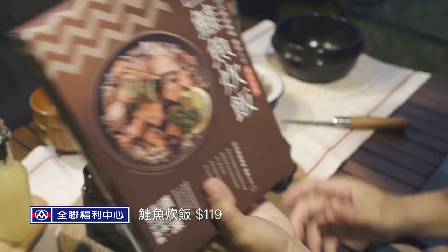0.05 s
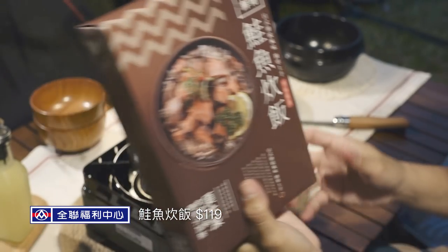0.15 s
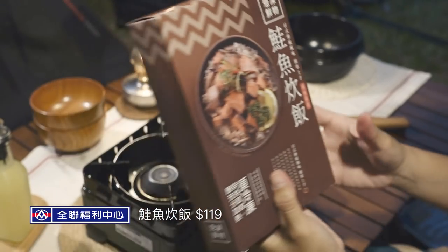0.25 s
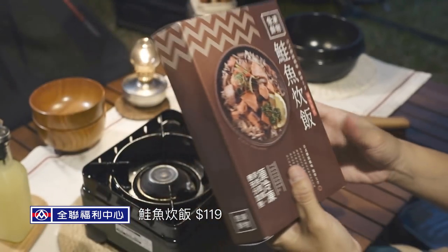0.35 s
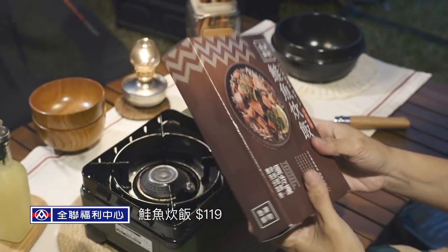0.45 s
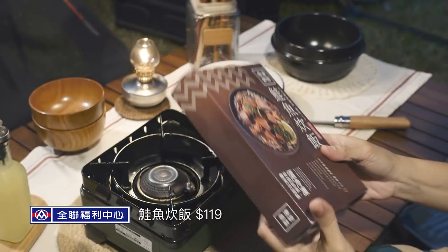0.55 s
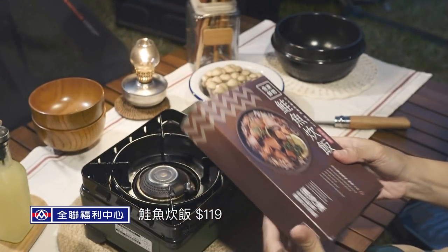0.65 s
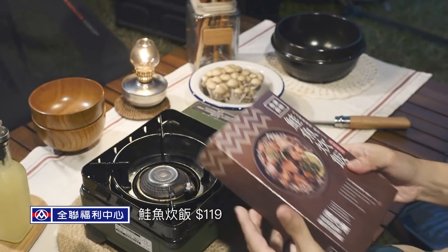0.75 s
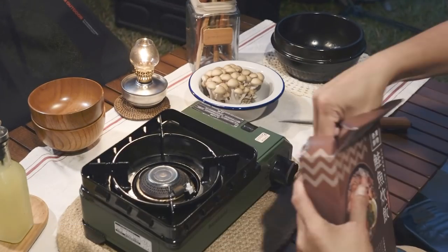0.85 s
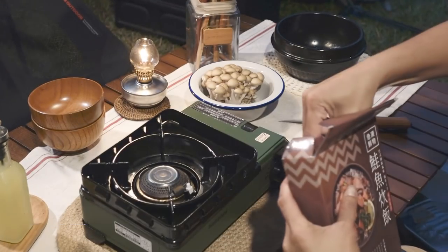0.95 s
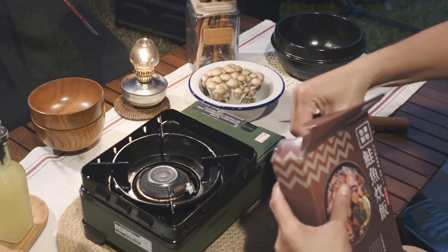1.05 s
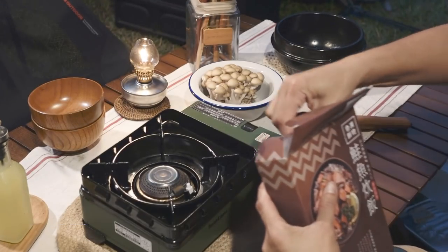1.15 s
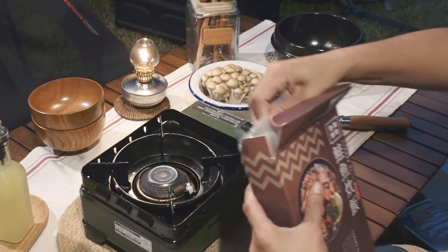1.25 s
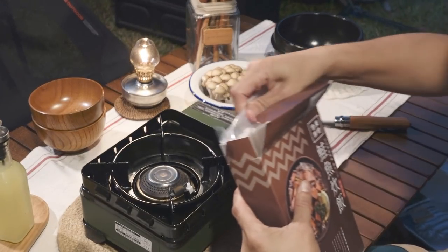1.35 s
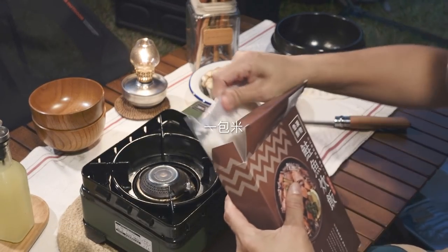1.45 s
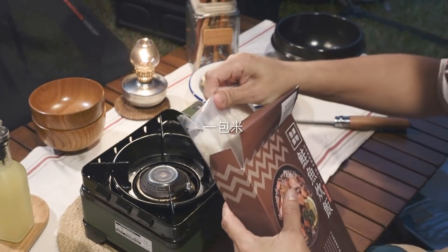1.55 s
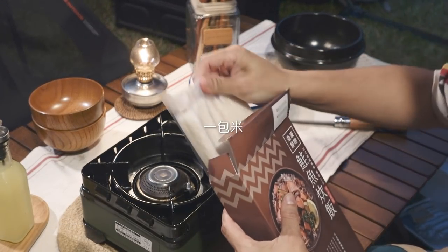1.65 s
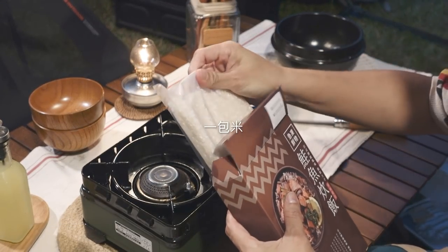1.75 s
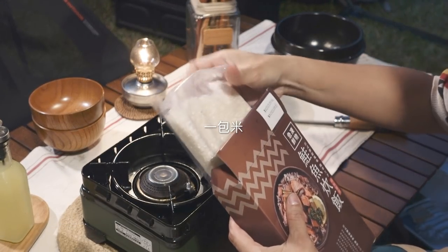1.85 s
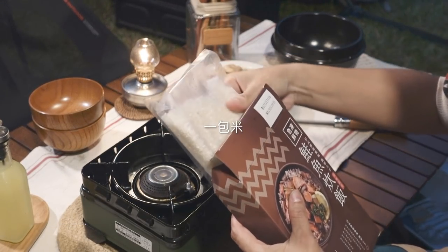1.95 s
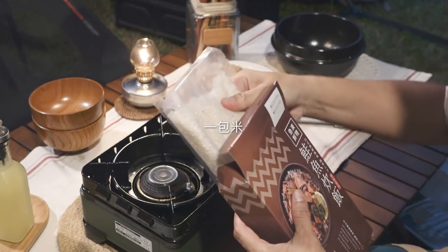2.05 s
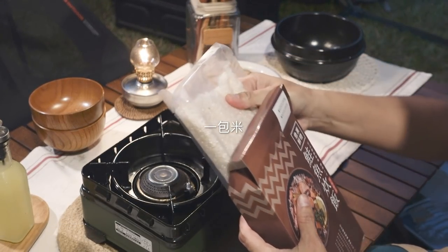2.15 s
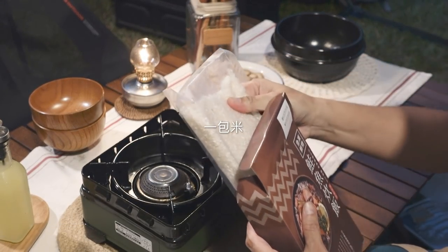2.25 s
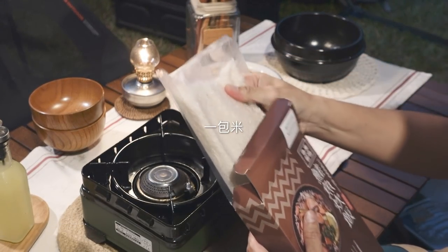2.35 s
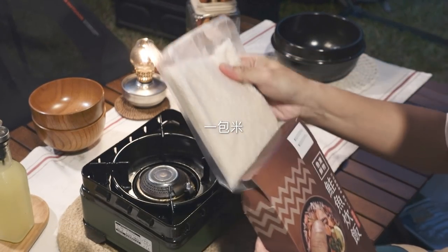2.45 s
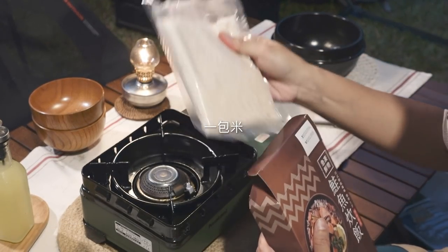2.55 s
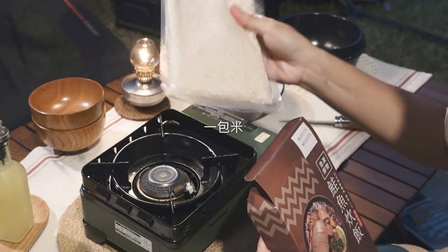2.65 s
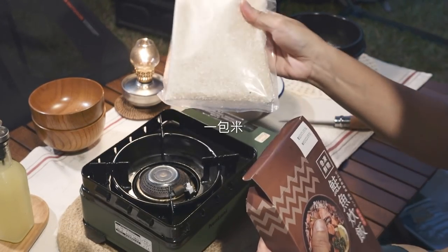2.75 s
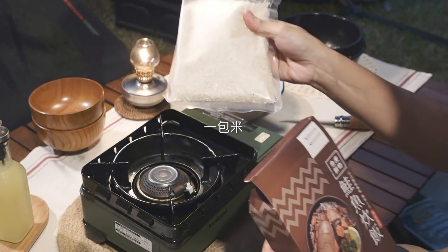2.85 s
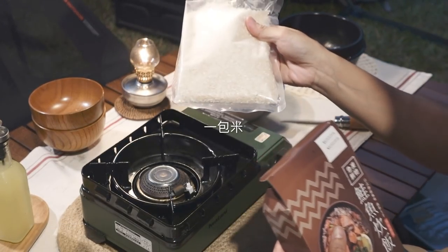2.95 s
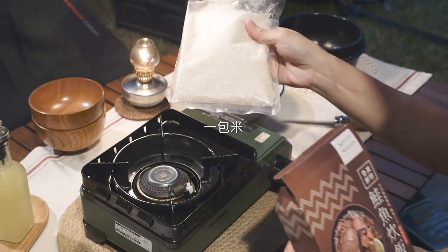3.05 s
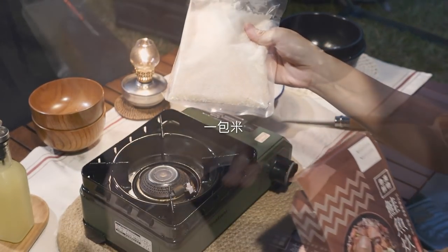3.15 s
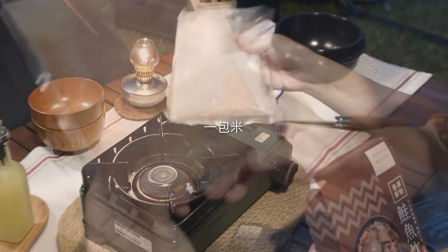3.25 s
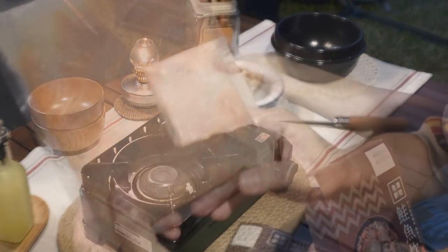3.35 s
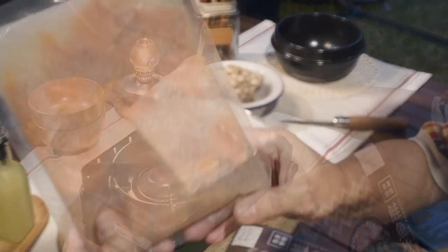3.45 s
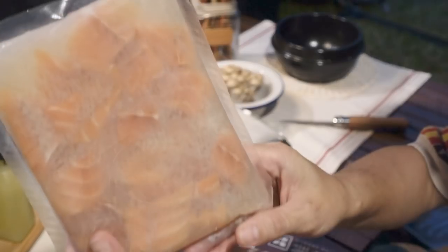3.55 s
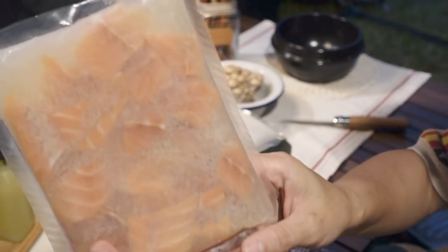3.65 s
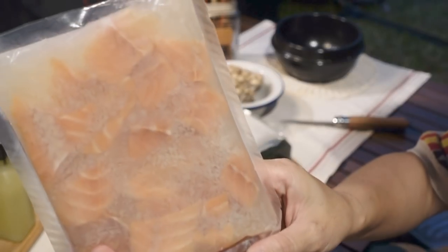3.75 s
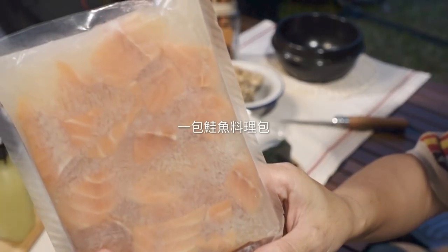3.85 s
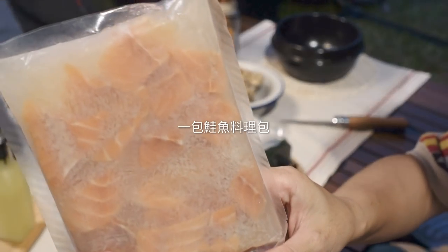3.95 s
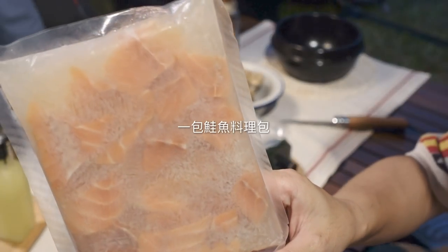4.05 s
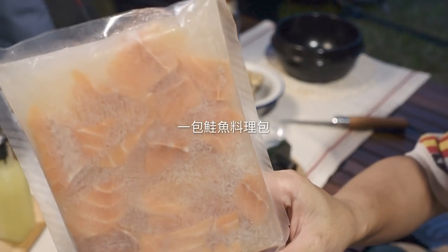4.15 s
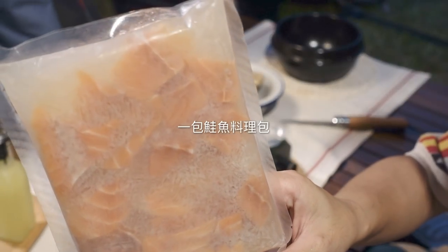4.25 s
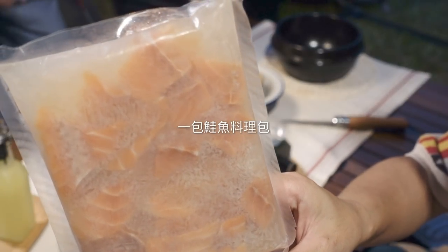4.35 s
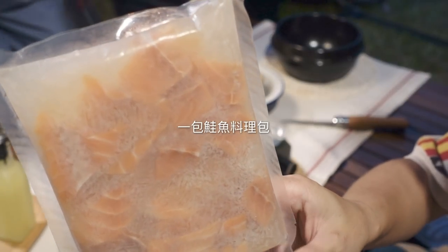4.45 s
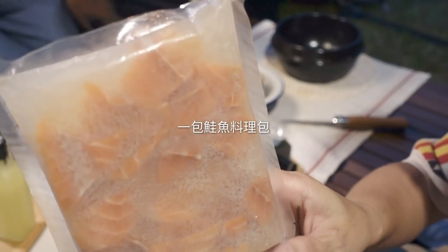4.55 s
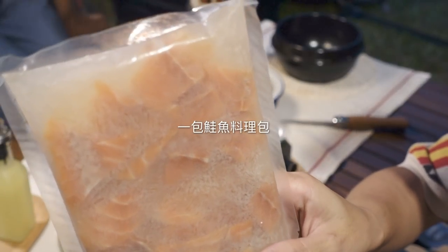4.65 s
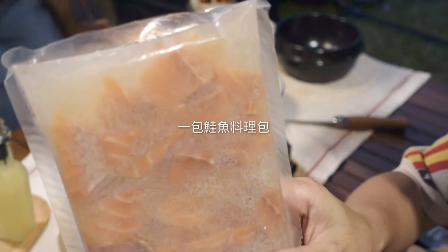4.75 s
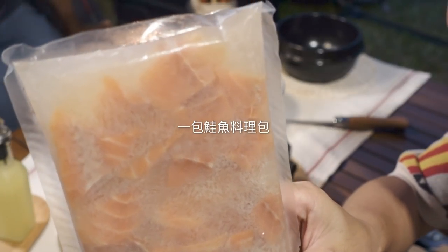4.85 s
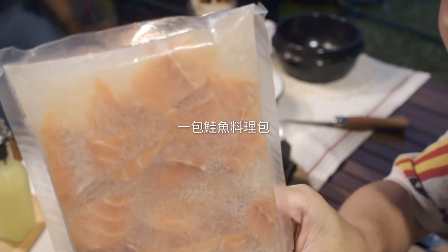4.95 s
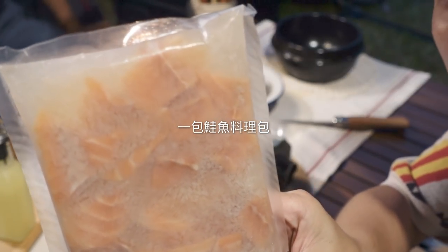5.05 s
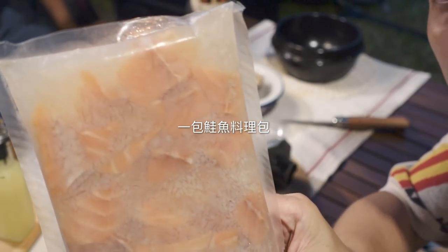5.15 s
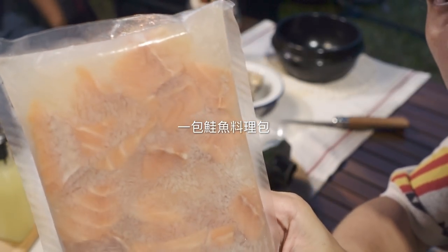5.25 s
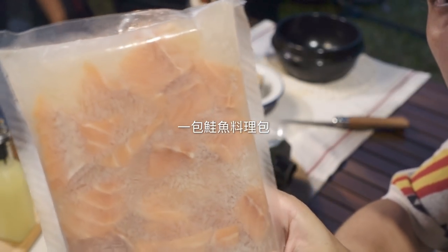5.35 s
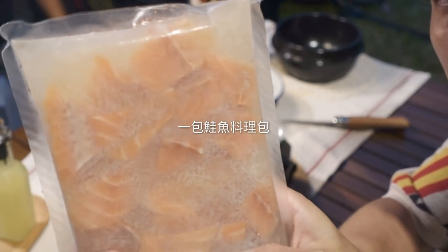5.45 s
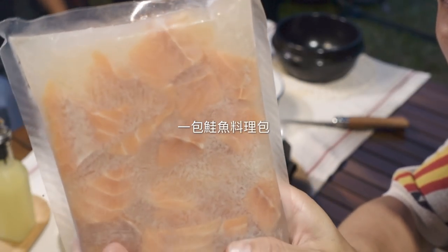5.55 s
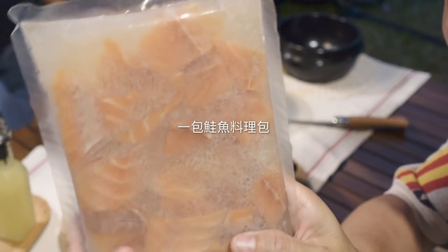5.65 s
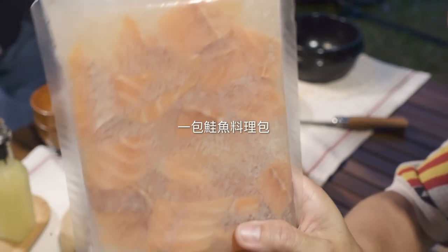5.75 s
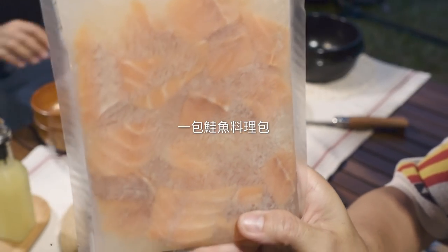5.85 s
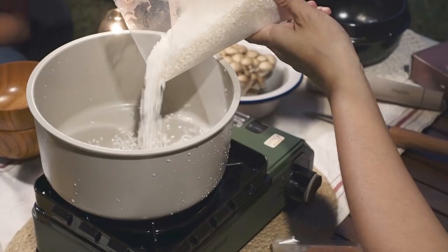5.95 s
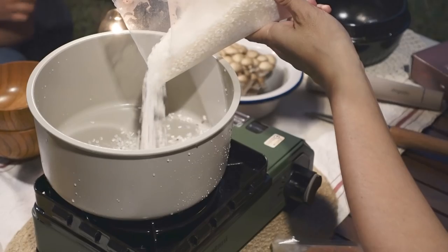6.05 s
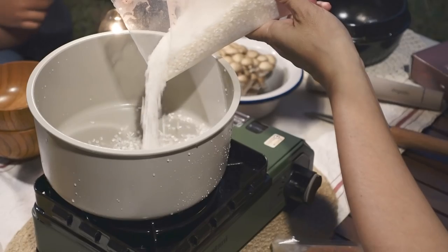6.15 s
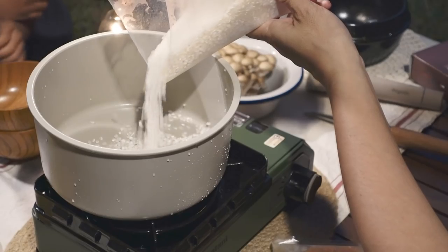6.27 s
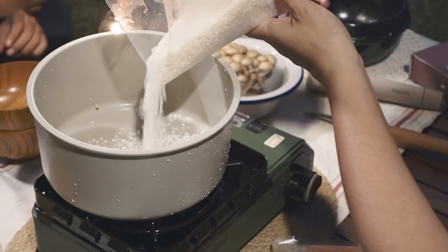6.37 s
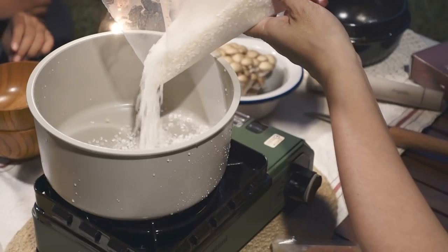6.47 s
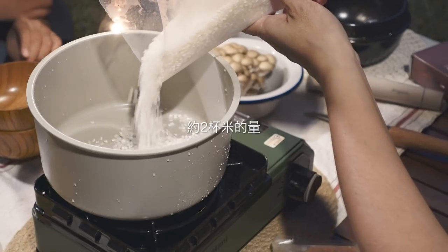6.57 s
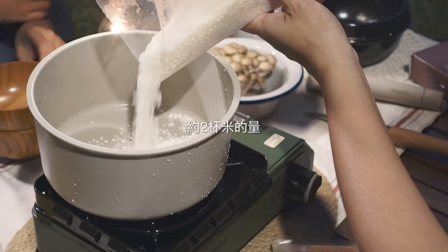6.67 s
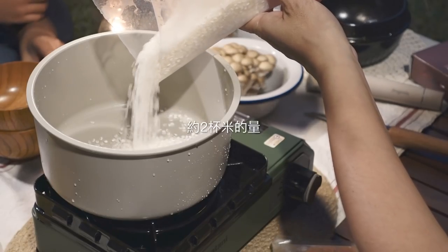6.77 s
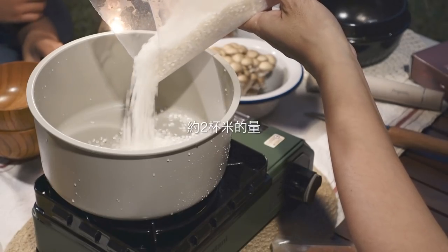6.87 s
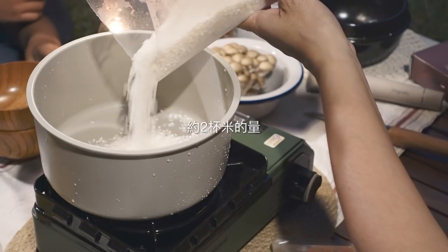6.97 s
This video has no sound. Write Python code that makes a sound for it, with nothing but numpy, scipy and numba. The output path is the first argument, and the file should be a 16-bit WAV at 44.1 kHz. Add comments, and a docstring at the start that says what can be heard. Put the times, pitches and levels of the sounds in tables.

```python
"""A stiff plastic bag is drawn from a card box outdoors at night, close to a camp table, and a second pack is turned.
Creases snap as short swinging tones with a crack and a short echo; the film rustles as many tiny creases plus hiss.
Then dry rice streams into a metal pot: random hits ring its modes until the bottom is covered, then only patter.
One low knock, made like the snaps, falls during the pour. Behind lie a soft night hiss, an insect chorus of
shimmering narrow noise and one faint two-tone squeak."""
import sys
import numpy as np
from scipy import signal
from scipy.fft import rfft, irfft
from scipy.io import wavfile
from numba import njit

SR = 44100
rng = np.random.default_rng(int(sys.argv[2]) if len(sys.argv) > 2 else 0)


def volts(x):
    """Linear amplitude factor 10**(x/20) for a level x in dB, scalar or array-like."""
    e = np.asarray(x, float) / 20
    return 10 ** e


def file_out(sig):
    """Save sig as 16-bit WAV at sys.argv[1]."""
    # one column per channel
    cols = np.atleast_2d(sig).T
    # limit, then scale
    lim = np.clip(cols, -1, 1)
    pcm = np.round(lim * 32767).astype(np.int16)
    wavfile.write(sys.argv[1], SR, pcm)


N = 309096  # length in samples
POUR_S = 5.968  # the rice starts and the hands stop
LEFT_RIGHT = np.array([[1], [-1]])  # adds a side signal to the left and takes it from the right


def unit(x):
    """Scale a sound to an rms of 1."""
    return x / np.sqrt(np.mean(x ** 2))


def columns(rows):
    """Turn each column after the time column into a curve over all samples."""
    s, *values = np.transpose(rows)
    return [np.interp(np.arange(N) / SR, s, v) for v in values]


def colour(x, points):
    """Filter by (Hz, dB) points with a causal response made from the cepstrum."""
    hz, db = np.transpose(points)
    bin_hz = np.arange(513) * SR / 1024
    log_gain = np.interp(np.log(bin_hz + 1), np.log(hz), db) * np.log(10) / 20
    cepstrum = irfft(log_gain)
    # folding the second half onto the first makes the response start at once
    cepstrum[1:512] *= 2
    cepstrum[513:] = 0
    response = irfft(np.exp(rfft(cepstrum)))
    return signal.fftconvolve(x, response)[:N]


def band(x, lo_hz, hi_hz, order=2):
    """Keep only the sound between two frequencies."""
    return signal.sosfilt(signal.butter(order, [lo_hz, hi_hz], "band", fs=SR, output="sos"), x)


def ring(x, hz, width_hz):
    """One mode of a ringing body, gain 1 at its centre; a narrow mode rings longer."""
    r = np.exp(-np.pi * width_hz / SR)
    feedback = [1, -2 * r * np.cos(2 * np.pi * hz / SR), r * r]
    return signal.lfilter([(1 - r * r) / 2, 0, (r * r - 1) / 2], feedback, x)


def ticks(per_s, spread_db):
    """Random impacts; most are small, a few large."""
    hit = rng.random(N) < per_s / SR
    return hit * rng.standard_normal(N) * volts(spread_db * rng.exponential(size=N))


def burst(at, db, decay_s, lo_hz, hi_hz):
    """Noise that starts at once and dies away."""
    gate = np.zeros(N)
    gate[at] = volts(db)
    envelope = signal.lfilter([1], [1, -np.exp(-1 / (decay_s * SR))], gate)
    return envelope * unit(band(rng.standard_normal(N), lo_hz, hi_hz))


@njit
def grains(at, hz, cycles, size, count, sr):
    """Each grain is a sine that dies within a few cycles."""
    out = np.zeros(count)
    for k in range(len(at)):
        z = size[k] + 0j
        turn = np.exp((2j * np.pi - 1 / cycles[k]) * hz[k] / sr)
        end = min(count, at[k] + int(6 * cycles[k] * sr / hz[k]))
        for i in range(at[k], end):
            out[i] += z.imag
            z *= turn
    return out


def squeak():
    """Rubbing makes two faint tones whose pitch climbs as it speeds up, and wavers."""
    # the two tones: top_s, spread_s (ends lie two spreads from the top), pitch_hz, level_db (peak)
    squeak_tones = [(4.174, 0.045, 3650, -46), (4.2, .04, 2190, -48)]
    t = np.arange(N) / SR
    out = np.zeros(N)
    for top_s, spread_s, tone_hz, tone_db in squeak_tones:
        u = np.clip((t - top_s) / spread_s, -2, 2)
        waver = 0.02 * unit(band(rng.standard_normal(N), 7.9, 120, order=1))
        bend = 1 - 0.033 * np.minimum(u, 0) ** 2 + waver
        # it swells faster than it fades
        level = volts(tone_db - 10 * u ** 2 * np.where(u < 0, 2, .5)) * (abs(u) < 2)
        out += level * np.sin(2 * np.pi * tone_hz * np.cumsum(bend) / SR)
    return out


def night():
    """Wide soft noise, an insect chorus of narrow noise that shimmers, and one faint squeak."""
    # colour of the night hiss: pitch_hz, relative level_db
    night_colour = [(100, -36), (250, -24), (900, -5.5), (2100, -10.5), (3500, -14.5), (6000, -21.5),
                    (15500, -24.5)]
    # insect chorus, one row: low_hz, high_hz, level_db (of its middle part)
    insect_band = (4540, 5250, -57)
    hiss_db, left_share = -53.5, 0.18  # the share makes the hiss lean left
    mid, side = (unit(colour(rng.standard_normal(N), night_colour)) for _ in range(2))
    lo_hz, hi_hz, insect_db = insect_band
    shimmer = volts(1.4 * unit(band(rng.standard_normal(N), 7.4, 80, order=1)))
    chorus, chorus_side = (unit(shimmer * band(rng.standard_normal(N), lo_hz, hi_hz)) * volts(insect_db)
                           for _ in range(2))
    middle = volts(hiss_db) * mid + chorus + squeak()
    wide = volts(hiss_db) * band(side + left_share * mid, 150, 11800) + 0.39 * chorus_side
    return middle + wide * LEFT_RIGHT


def pouring():
    """The pot rings until rice covers its bottom; the patter grows as the bed heaps up."""
    ring_db, muffle_db = -20.5, 22  # bare pot; loss once covered
    covered_s, covering_s = 6.66, 0.079  # when the bottom is half covered; how gradually
    patter_db, first_db, heap_s = -34.5, -36, 0.11  # on a full bed; start relative to that; heaping time
    bare_db = 0.5  # extra patter while grains skip on metal
    t = np.arange(N) / SR
    before_db = np.where(t < POUR_S, -100, 0)
    covered = (1 + np.tanh((t - covered_s) / covering_s / 2)) / 2
    heap_db = first_db * np.exp(-np.maximum(t - POUR_S, 0) / heap_s)
    pot_db = ring_db - muffle_db * covered + before_db
    return pot_db, patter_db + heap_db + bare_db * (1 - covered) + before_db


def rice():
    """Grains land at scattered spots, so each mode of the pot gets its own push; the growing bed only patters."""
    # modes of the metal pot, many in close pairs: pitch_hz
    pot_pitches = [810, 1090, 2135, 3430, 4346, 4480, 5050, 5540, 5980, 6135, 6288, 7132, 8442, 8522, 8693,
                   9332, 9714, 10154, 10584, 11104, 11902, 11947, 13320, 13861, 14120, 15600]
    # the same modes in the same order: width_hz, relative level_db
    pot_modes = [(68, -30.5), (48, -18.5), (64, -12.5), (90, -18), (45, -13), (70.6, -16), (90, -18),
                 (50, -17), (50, -11.5), (40, -8), (45, -12.5), (54.7, -10), (35, -4.5), (35, -15),
                 (25, -8.5), (30, -8), (30, -13), (32, -3), (28, -16), (50, -9), (30, -6), (25, -11),
                 (90, -16), (22, -14), (84.5, -16.5), (70, -14.5)]
    # colour of rice falling on rice: pitch_hz, relative level_db
    bed_colour = [(450, -1.5), (1100, 15), (2000, 15), (6000, 15), (9000, 12), (15500, 3)]
    ring_db, bed_db = pouring()
    hits = np.abs(ticks(9000, 0.9))
    # the first layer of rice damps the modes of the bottom, near 2.5 kHz, soonest
    damp_db = 16 * np.clip(np.arange(N) / SR - POUR_S - .3, -.3, .3)
    modes = []
    for hz, (width_hz, mode_db) in zip(pot_pitches, pot_modes):
        nearness = np.exp(-np.log(hz / 2500) ** 2 / 0.18)
        push = hits * rng.standard_normal(N)
        modes.append(volts(mode_db - damp_db * nearness) * ring(push, hz, width_hz))
    modes = np.array(modes)
    pot = modes.sum(axis=0)
    # each mode leans left or right at random
    pot_side = np.sum(modes * np.sign(rng.standard_normal((len(modes), 1))), axis=0)
    bed, bed_side = (unit(colour(ticks(6000, 1.0), bed_colour)) for _ in range(2))
    ringing = volts(ring_db) / np.std(pot) * (pot + 0.073 * pot_side * LEFT_RIGHT)
    return ringing + volts(bed_db) * (bed + 0.019 * bed_side * LEFT_RIGHT)


def handling():
    """Each movement speeds up and slows down like a bell; creasing and hiss follow it over the steady grip."""
    # hand movements: top_speed_s, length_s, crease_db, hiss_db (relative to creasing)
    movements = [(0.072, 0.47, -53.5, -9), (0.595, 1, -53.5, -1), (0.886, 0.079, -42, -0.5),
                 (0.939, 0.11, -43.5, 3), (1.068, 0.21, -40, -4.5), (1.16, 0.12, -39.5, 0),
                 (1.23, 0.18, -33, -1), (1.32, 0.17, -40, -5.5), (1.478, 0.21, -35.5, -4.5),
                 (1.626, 0.12, -41.5, -0.5), (1.698, 0.21, -35, -1.2), (1.81, 0.24, -40, 1.5),
                 (1.92, 0.16, -40.5, 5.5), (1.964, 0.088, -35, 2), (2.051, 0.17, -35.5, 0),
                 (2.152, 0.35, -44, -5), (2.287, 0.17, -47, -2.5), (2.39, 0.23, -31.5, -1.5),
                 (2.447, 0.18, -24.5, -4.5), (2.53, 0.2, -35.5, -5), (2.661, 0.082, -32, -4),
                 (2.722, 0.38, -40.5, 2), (3.365, 0.37, -51.5, 2.5), (3.528, 0.13, -43.5, -5.5),
                 (3.756, 0.23, -52.5, -3), (4.371, 0.4, -48.5, 3), (4.596, 0.087, -43.5, -3.5),
                 (4.764, 0.26, -47, -3.5), (5.04, 0.59, -48, 6), (5.3, 0.39, -45, 8.5),
                 (5.415, 0.06, -38, -2), (5.483, 0.19, -46, 6.5), (5.725, 0.059, -40, 3),
                 (5.941, 0.13, -48.5, 4.5)]
    # film held in the fingers is never quite still: time_s, crease_db
    grip_levels = [(.84, -64), (.9, -47), (2.75, -56.5), (2.9, -61.5), (3.3, -55), (4.8, -54), (5.65, -48),
                   (5.8, -55.5)]
    grip_hiss_db = 1.5  # relative to creasing
    edge_db, rise_share = 33, 0.54  # drop at a movement's ends; share of its length spent speeding up
    t = np.arange(N) / SR
    grip = volts(columns(grip_levels)[0]) ** 2
    crease, hiss = grip, grip * volts(grip_hiss_db) ** 2
    for top_s, length_s, db, hiss_db in movements:
        u = (t - top_s) / (length_s * np.where(t < top_s, rise_share, 1 - rise_share))
        power = volts(db - edge_db * np.minimum(u ** 2, 10)) ** 2
        crease = crease + power
        hiss = hiss + power * volts(hiss_db) ** 2
    stop_db = np.where(t < POUR_S, 0, -60)
    return 10 * np.log10(crease) + stop_db, 10 * np.log10(hiss) + stop_db


def rustle():
    """Bending film makes many small creases of scattered pitch and place; sliding film makes a fine hiss."""
    # colour of film sliding on skin: pitch_hz, relative level_db
    film_colour = [(1500, -7.5), (3600, 4.5), (8000, -1), (15500, -19)]
    crease_db, hiss_db = handling()
    chance = rng.random((int(2500 * N / SR), 5))
    spread = rng.standard_normal(len(chance))
    at = (chance[:, 0] * N).astype(np.int64)
    # light, hissy handling bends smaller creases, which ring higher
    hz = np.minimum(2300 * np.exp(.45 * spread + .035 * (hiss_db - crease_db)[at]), 9000)
    # hard creasing mixes a few large folds among the small; gentle handling stays even
    coarse_db = np.clip(4.0 + 0.23 * (crease_db + 35.0), 1.2, 2.6)
    size = volts(-coarse_db[at] * np.log(chance[:, 1])) * np.sign(chance[:, 2] - .5)
    cycles = 1.5 + 2.5 * chance[:, 3]
    place = 0.28 * (chance[:, 4] - .5)
    mid = grains(at, hz, cycles, size, N, SR)
    side = grains(at, hz, cycles, size * place, N, SR)
    creases = volts(crease_db) * (mid + side * LEFT_RIGHT) / np.std(mid)
    hiss, hiss_side = (unit(colour(ticks(9000, 0.6 * coarse_db), film_colour)) for _ in range(2))
    # smooth sliding, with little creasing, is brighter
    hiss = hiss + volts(hiss_db - crease_db - 13.5) * band(hiss, 8700, 16800)
    return creases + volts(hiss_db) * (hiss + 0.036 * hiss_side * LEFT_RIGHT)


def snaps_and_knock():
    """A crease buckles: its panel swings, the fold cracks and neighbours chatter; a low knock is made alike."""
    # creases that snap, and last one low knock during the pour:
    # start_s, level_db (before the trims below), pitch_hz, crack_db (relative to level_db)
    snap_rows = [(0.076, -33, 1820, -24), (0.4284, -30.5, 1250, -6), (0.902, -15.5, 3080, -9.5),
                 (0.9305, -14, 1800, -6), (0.989, -15.5, 1780, -9.5), (1.015, -12, 1870, -17.5),
                 (1.055, -18, 2170, -19), (1.126, -23.5, 2210, -2.5), (1.151, -11, 1920, -8.5),
                 (1.208, -22.5, 3070, 1), (1.223, -19.5, 1470, 5.5), (1.3022, -17, 1460, -19),
                 (1.3106, -9, 1960, -23), (1.3124, -11, 1300, -31), (1.468, -18, 1530, -11),
                 (1.682, -19.5, 650, -39), (1.747, -17, 1710, -15), (1.784, -8, 2510, -15),
                 (1.7905, -23, 4760, -18), (1.819, -23, 2500, -4), (1.928, -20.5, 1310, -12),
                 (2.018, -10, 2720, -18), (2.058, -17, 1680, -18), (2.126, -18.5, 990, -31),
                 (2.148, -10.5, 3220, -26), (2.2623, -14.5, 2200, -16), (2.349, -3, 2500, -24.5),
                 (2.389, -9, 866, -19), (2.398, -18, 2410, 2), (2.413, -8.5, 830, -21),
                 (2.462, -6.5, 1180, -9.5), (2.478, -18, 1120, -40), (2.5064, -2, 3000, -71),
                 (2.53, -7, 1040, -12.5), (2.647, -7.5, 3360, -37), (2.68, -15, 1490, -20),
                 (2.702, -11.5, 1830, -20), (2.709, -13.5, 1670, -15), (2.721, -15.5, 1490, -17),
                 (2.74, -16, 1940, -7.5), (3.1645, -31, 2560, -25), (3.251, -26, 3380, -29),
                 (3.2935, -30, 6500, -12), (3.518, -30.5, 1190, -3), (3.949, -24.5, 2700, -15),
                 (4.486, -29.5, 4400, -0.5), (4.575, -40, 1700, -7), (5.14, -26, 5500, -15),
                 (5.263, -18.5, 2500, -14), (5.4024, -9, 1530, -55), (5.4027, -8.5, 3080, -58),
                 (5.564, -24.5, 3000, -20), (5.5933, -18.5, 7100, -13), (5.722, -23.5, 7000, -7.5),
                 (6.818, -22, 1080, -40)]
    s, db, hz, crack_db = np.transpose(snap_rows)
    at = (s * SR).astype(np.int64)
    # a slow decay minus a fast one: the swing builds up over its first cycle
    size = volts(db + 7.5)
    slow = 0.97 * grains(at, hz, np.full(len(s), 1.11), size, N, SR)
    fast = 1.155 * grains(at, hz, np.full(len(s), 0.42), size, N, SR)
    # five small grains follow each start within 2 ms, at rising pitches and falling levels
    chance = rng.random((len(s), 5, 2))
    late = (at[:, None] + .002 * SR * chance[..., 0] ** 2).astype(np.int64).ravel()
    near_hz = (hz[:, None] * (1.1 + .4 * (np.arange(5) + chance[..., 1]))).ravel()
    near_size = np.repeat(volts(db - 2.0 + 0.36 * crack_db), 5) * np.tile(volts(-1.3 * np.arange(5)), len(s))
    chatter = grains(late, np.minimum(near_hz, 6500), np.full(len(late), 1.8), near_size, N, SR)
    crack = burst(at, db + crack_db + 0.5, 0.0029, 1180, 6670)
    return slow - fast + chatter + crack


def surroundings(x):
    """One echo, strong while the bag is in the box, then a short scatter from things around, unlike left and right."""
    echo_s, box_echo_db, open_echo_db, leaves_box_s = .0057, -4, -13, 2.485
    tail_db, tail_t60_s = -8, .06  # t60 is the time to fall by 60 dB
    t = np.arange(int(.15 * SR)) / SR
    scatter = rng.standard_normal((2, len(t))) * volts(-60 * t / tail_t60_s) * (t > .002)
    scatter = scatter[0] + 0.5 * scatter[1] * LEFT_RIGHT
    scatter *= volts(tail_db) / np.sqrt(np.sum(scatter[0] ** 2))
    echo_db = np.where(np.arange(N) < leaves_box_s * SR, box_echo_db, open_echo_db)
    echo = np.roll(x, int(echo_s * SR)) * volts(echo_db)
    return x + echo + np.array([signal.fftconvolve(x, h)[:N] for h in scatter])


def scene():
    """All near sounds lose their bass, as small thin sheets and grains radiate almost none; the night is added."""
    # treble leans to the right while the bag is drawn out: time_s, share
    right_lean = [(2.6, 0.11), (3.2, 0.026)]
    hands_and_knock = surroundings(snaps_and_knock()) + rustle()
    treble = band(hands_and_knock.mean(axis=0), 3900, 15000, order=1) * columns(right_lean)[0]
    near = hands_and_knock - treble * LEFT_RIGHT + rice()
    thin = signal.sosfilt(signal.butter(3, 560, "high", fs=SR, output="sos"), near)
    return thin + night()


def roll_off(x):
    """The treble ends steeply here."""
    return signal.sosfilt(signal.butter(12, 16680, fs=SR, output="sos"), x)


def record(dry):
    """A steep low-pass filter cuts the top off sharply at 15680 Hz."""
    mix = signal.sosfilt(signal.ellip(10, .2, 70, 15680, fs=SR, output="sos"), dry)
    return roll_off(mix)


dry = scene()
out = record(dry)
file_out(out)
```